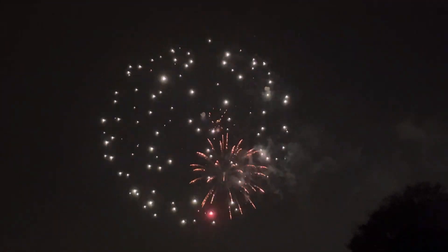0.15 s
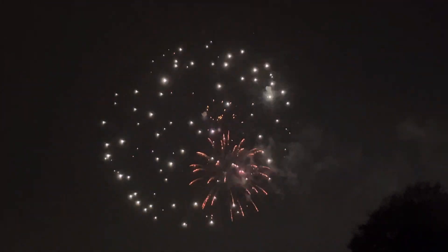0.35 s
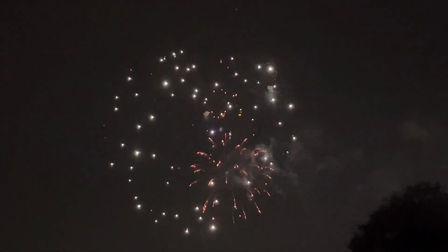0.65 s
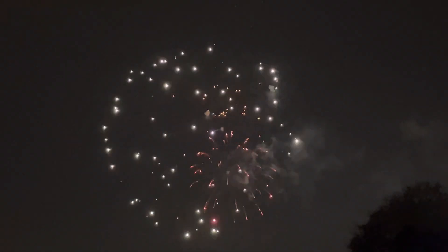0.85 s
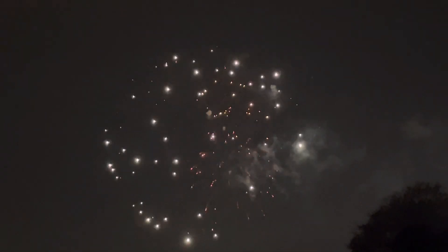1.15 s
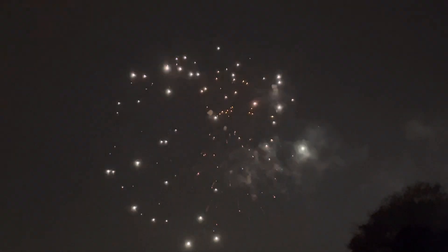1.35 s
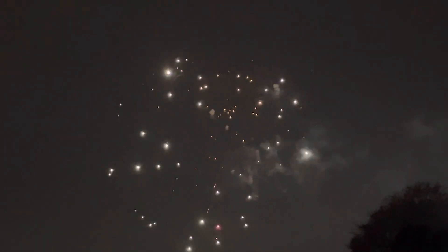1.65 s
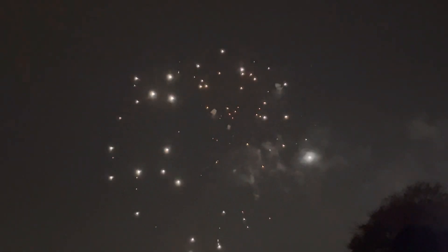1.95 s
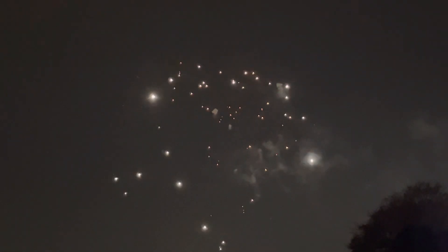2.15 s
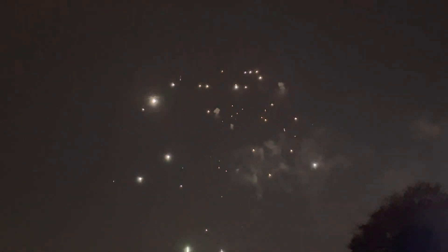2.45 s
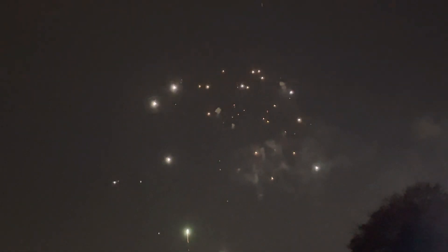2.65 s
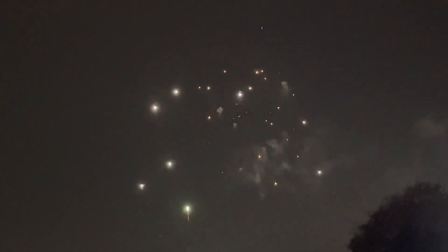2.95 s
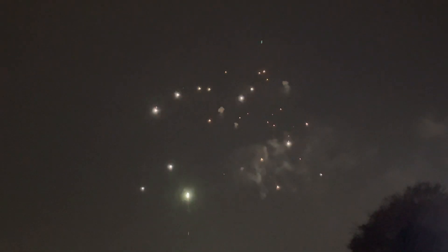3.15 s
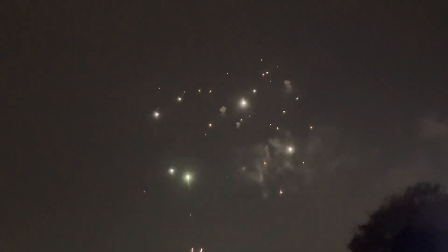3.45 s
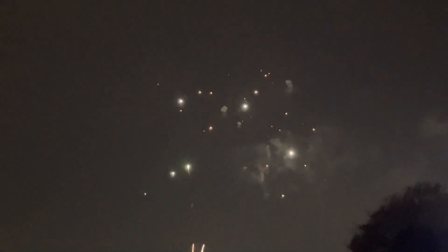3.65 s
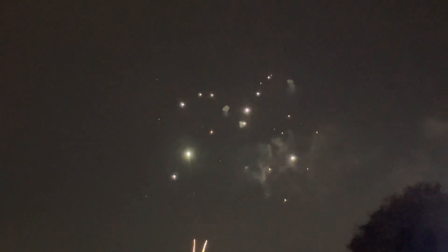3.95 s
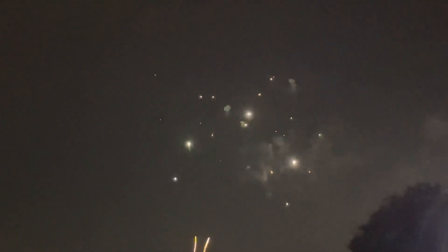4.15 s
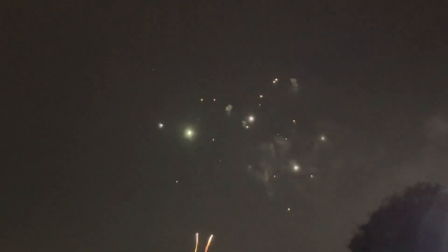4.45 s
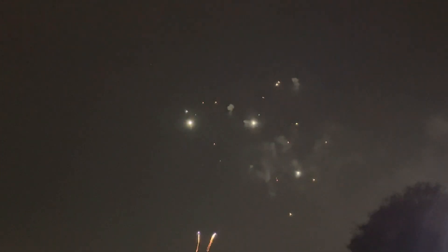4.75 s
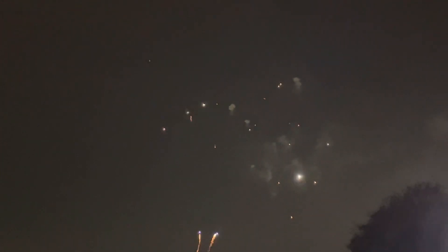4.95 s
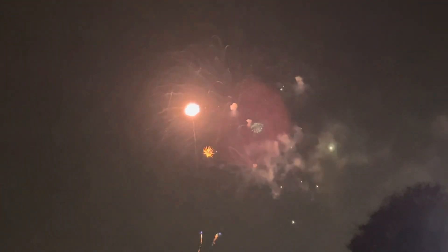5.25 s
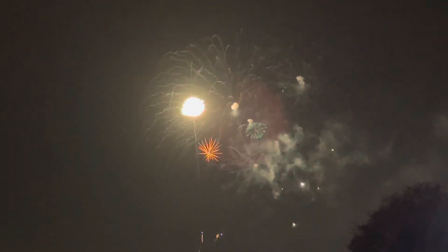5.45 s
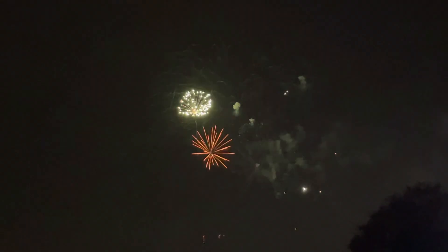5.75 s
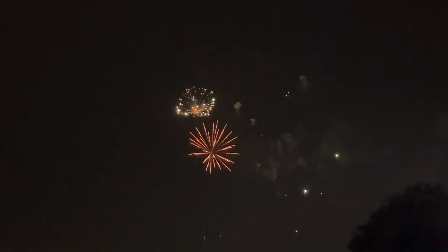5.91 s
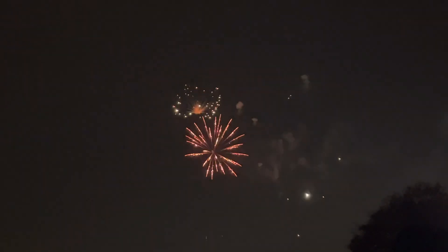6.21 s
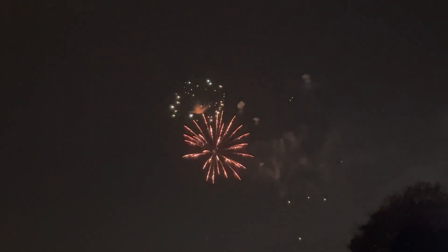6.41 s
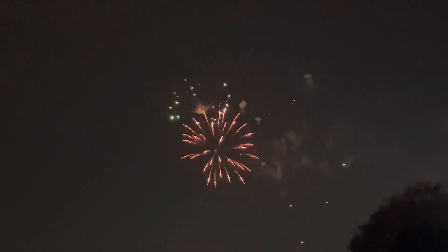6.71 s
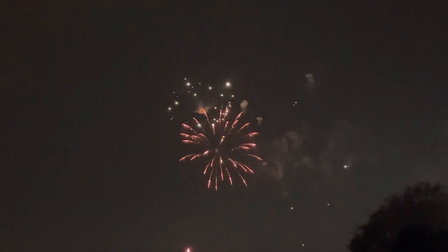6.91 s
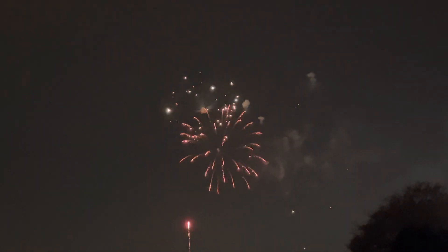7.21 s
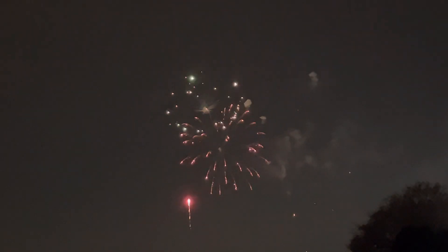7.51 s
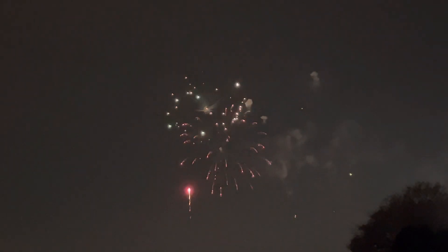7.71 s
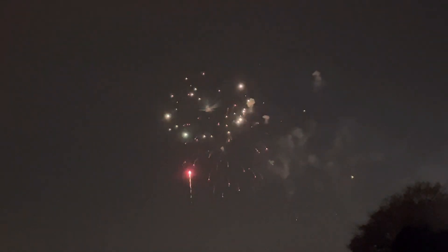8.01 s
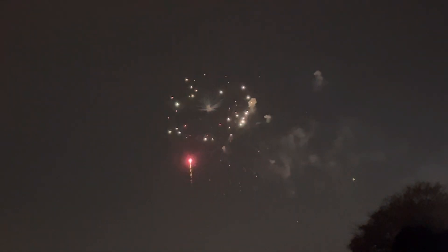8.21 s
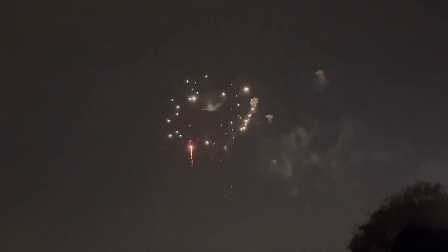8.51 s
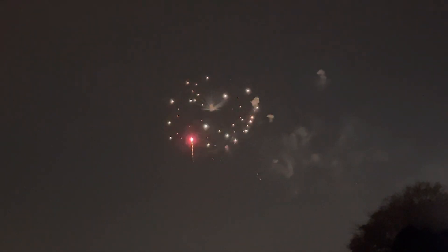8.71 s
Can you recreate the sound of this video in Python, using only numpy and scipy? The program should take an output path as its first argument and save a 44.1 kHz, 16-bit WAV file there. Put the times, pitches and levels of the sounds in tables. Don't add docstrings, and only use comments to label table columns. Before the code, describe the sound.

A firework display at night in the open. A dull bang opens, then a very sharp crack near two seconds. Around four seconds two launch charges knock close together, then quieter rumbling. A strong doubled bang comes just after seven seconds and a low booming launch near eight and a half. Echoes slap back from buildings, over distant thuds; a small handheld microphone adds faint hiss and rustle.

```python
import sys
import numpy as np
from scipy import signal
from scipy.fft import rfft, irfft, next_fast_len
from scipy.io import wavfile
from scipy.ndimage import uniform_filter1d

SR = 44100
rng = np.random.default_rng(int(sys.argv[2]) if len(sys.argv) > 2 else 0)


def decibels_to_gain(level_db):
    exponent = np.asarray(level_db, float) / 20
    return 10 ** exponent


def int16_out(signal):
    q = np.round(np.clip(np.atleast_2d(signal).T, -1, 1) * 32767)
    wavfile.write(sys.argv[1], SR, q.astype(np.int16))


N = 391166

# (time [s], wave length [ms], ground echo delay [ms], echo share [ratio], shock front [Hz])
BURSTS = [
    (.3871, 2.27, 1.87, 0.5, 1870),
    (1.8937, 3.14, 2.73, 1.3, 9400),
    (7.1675, 2.17, 3.65, 2.15, 4060),
]
# (time [s], knock [dB], boom against knock [dB], crack against knock [dB], knock [Hz])
LIFTS = [
    (3.915, -4.5, 5, 2, 807),
    (4.307, -8, 3.5, 4, 730),
    (8.409, -10.5, 9, 9, 454),
]
# (frequency [Hz], side against middle [dB])
DIFFUSE_SIDE = [(60, -12.5), (110, -11), (200, -15), (380, -8), (700, -2), (1290, -4.5), (2380, -31),
                (4400, -12.5), (8120, -3.5), (15000, -6)]


def read(points, hz):
    f, value = np.transpose(points)
    return np.interp(np.log(hz + 1), np.log(f + 1), value)


def evened(x):
    return x / np.sqrt(np.mean(x ** 2) + 1e-20)


def peaked(x):
    return x / abs(x).max()


def add(mix, s, sound):
    part = mix[round(s * SR):][:len(sound)]
    part += sound[:len(part)]


def shaped(x, gain):
    size = next_fast_len(x.shape[-1] + 4096)
    spectrum = rfft(x, size) * gain(np.fft.rfftfreq(size, 1 / SR))
    return irfft(spectrum, size)[..., :x.shape[-1]]


def coloured(x, points):
    return shaped(x, lambda hz: decibels_to_gain(read(points, hz)))


def band(x, hz, width):
    return signal.lfilter(*signal.iirpeak(hz, hz / width, SR), x)


def wide(middle, side, side_points):
    side = coloured(side, side_points)
    return np.array([middle + side, middle - side])


def burst(s, wave_ms, echo_ms, share, front_hz):
    shell_db, shared = 3.5, 0.9
    ms = np.arange(2000) / SR * 1000
    wave = (1 - ms / 0.73) * np.exp(-ms / 2.0 - np.maximum(ms - wave_ms, 0) / 0.28)
    wave = signal.lfilter(*signal.butter(1, front_hz, fs=SR), wave)
    lag = round(echo_ms / 1000 * SR)
    wave[lag:] += share * wave[:-lag]
    return s, decibels_to_gain(shell_db) * wave / (1 + share) ** shared


def shells_overhead():
    # (frequency [Hz], gain [dB])
    air = [(22, -33), (35, -8), (55, 1), (90, 12.5), (220, 3.5), (400, 7), (1500, 5.5), (3000, 5),
           (5000, -9.5), (7000, -11), (9000, -56), (16000, -60.5)]
    mix = np.zeros(N)
    for row in BURSTS:
        add(mix, *burst(*row))
    return coloured(mix, air)


def report(chance, boom_s, front, smear_s, s, db, boom_db, crack_db, knock_hz, crack_hz):
    lead_s = .012
    t = np.arange(len(chance)) / SR - lead_s
    spread = np.where(t < 0, 0.26 * np.exp(t / 0.0028), np.exp(-t / smear_s))
    arrivals = chance ** 3 * spread
    first = np.arange(len(t)) == round(lead_s * SR)
    knock = band(band(front * first + arrivals, knock_hz, 150), knock_hz, 850)
    crack = band(arrivals, crack_hz, 620) + 0.033 * band(arrivals, 1500, 1800)
    cycle = (t - .0074) * 88
    boom = np.cos(2 * np.pi * cycle + 4.64) * np.exp(-((t - boom_s) * 135) ** 2)
    sound = 1.2 * peaked(knock) + 1.15 * decibels_to_gain(crack_db) * peaked(crack) + decibels_to_gain(boom_db) * boom
    return s - lead_s, decibels_to_gain(db) * sound


def lift_charges():
    mix = np.zeros(N)
    for row, chance in zip(LIFTS, rng.standard_normal((len(LIFTS), 2400))):
        crack_hz = 840 + 0.9 * row[-1]
        add(mix, *report(chance, .0085, 43.5, 0.0048, *row, crack_hz))
    return mix


def thrown_back():
    wall_lag = [.151, .157, .164, .179, .177, .176]
    # (knock [dB], crack against knock [dB], knock [Hz], crack [Hz])
    wall = [
        (-19, -7.5, 416, 950),
        (-26, 3.5, 720, 1280),
        (-20, -1, 300, 830),
        (-12.5, -8, 490, 2200),
        (-19, -5.5, 615, 2360),
        (-18.5, 0, 596, 1960),
    ]
    # (delay [s], loss [dB], boom against knock [dB], knock [Hz])
    yard = [
        (.113, -25, 3, 510),
        (0.149, -34, 4.5, 635),
        (.2125, -20, 7, 637),
        (0.279, -30.5, -1, 437),
    ]
    # (time [s], knock [dB], crack against knock [dB], knock [Hz])
    later = [(0.58, -34, 0, 400), (0.666, -30, -9, 418), (0.705, -38.5, -17, 560), (0.779, -37, 3.5, 436),
             (0.852, -33, -16, 497), (2.088, -29.5, -1, 707), (2.194, -31.5, -20, 543),
             (2.238, -30.5, -12, 710), (2.282, -37.5, -6, 900), (2.358, -38.5, -17, 970),
             (3.451, -32.5, -13, 690), (3.735, -34, -25, 473), (4.867, -40.5, 1, 590),
             (5.154, -32, -10, 550), (5.216, -33, -14, 566), (5.259, -37.5, -19, 556),
             (5.347, -32, -7, 597), (5.542, -38, -11, 580), (5.609, -40.5, -12, 560),
             (5.741, -37, -17, 570), (5.99, -38.5, -13, 437), (6.39, -36, -23, 544), (7.356, -27, -16, 700),
             (7.371, -32, 2.5, 560), (7.397, -28, -7.5, 430), (7.479, -38, -8, 560),
             (7.522, -32.5, -16, 490), (7.57, -33, -11, 423), (8.649, -27, -2, 463), (8.735, -32, -15, 484)]
    slap_crack_hz = 1600
    booms = [-16.5] * len(BURSTS) + [row[2] - 0.5 for row in LIFTS]
    rows = []
    for bang, lag, boom, (db, *rest) in zip(BURSTS + LIFTS, wall_lag, booms, wall):
        rows.append((bang[0] + lag, db, boom, *rest))
    for s, db, *_ in LIFTS[:2]:
        for lag, loss, boom, hz in yard:
            rows.append((s + lag, db + loss, boom, -5.5, hz, slap_crack_hz))
    for s, db, crack, hz in later:
        rows.append((s, db, 2.5, crack, hz, slap_crack_hz))
    return rows


def thud(s, db, hz, cycles):
    v = np.arange(round(SR * (cycles + 2) / hz)) * hz / SR
    envelope = np.e * (3 * v / cycles) * np.exp(-3 * v / cycles)
    return s - .008, decibels_to_gain(db - 4.5) * np.sin(2 * np.pi * v) * envelope


def slaps_and_thuds():
    # (time [s], peak [dB], pitch [Hz], length
    bass_thuds = [(0.98, -20.5, 140, 7.3), (1.247, -16.5, 134.7, 3.2), (1.703, -20.5, 228, 3.3),
                  (2.858, -30.5, 99.4, 0.42), (2.905, -21.5, 195, 1.9), (2.981, -18, 171, 3.7),
                  (3.203, -23.5, 172.6, 4.6), (4.161, -17, 82.6, 1.8), (4.561, -25.5, 62.2, 1.3),
                  (5.883, -18.5, 148.6, 1), (5.986, -20.5, 77.4, 1.6), (8.171, -29, 223, 2.9),
                  (8.237, -14, 185, 1.6), (8.303, -22.5, 83, 1.3), (8.655, -16.5, 87.3, 1.6),
                  (8.676, -21.5, 67.6, 2.5), (7.336, -18, 118.5, 3.2)]
    mix = np.zeros(N)
    rows = thrown_back()
    for row, chance in zip(rows, rng.standard_normal((len(rows), 2400))):
        add(mix, *report(chance, .0105, 21, 0.0062, *row))
    for row in bass_thuds:
        add(mix, *thud(*row))
    return mix


def echoes(x, decays, start_s, rise_s):
    # (frequency [Hz], gain [dB])
    leaves = [(40, -11), (150, 0), (400, 1.5), (2000, -0.5), (3500, 1), (5500, 3), (9000, 1.5)]
    taps = rng.choice([-1., 1.], (2, 2 * SR)) * (rng.random((2, 2 * SR)) < 2500 / SR)
    hz, t, z = signal.stft(taps, SR, nperseg=256)
    tail = signal.istft(z * decibels_to_gain(-60 * t / read(decays, hz)[:, None]), SR, nperseg=256)[1]
    tail *= np.clip((np.arange(tail.shape[1]) / SR - start_s) / rise_s, 0, 1)
    both = signal.fftconvolve(x[None], tail / np.linalg.norm(tail[0]), axes=1)[:, :N]
    return wide(*coloured(both, leaves), DIFFUSE_SIDE)


def after_roll(t, start_db, rise_s, halving_db):
    bangs = [(-0.41, 0)]
    bangs += [(row[0], 0) for row in BURSTS] + [(row[0], -7) for row in LIFTS]
    power = 0
    for s, db in bangs:
        age = np.maximum(t - s, 0)
        fall_db = halving_db * np.log2(1 + age / 0.034)
        power = power + (1 - np.exp(-age / rise_s)) ** 2 * decibels_to_gain(start_db + db - fall_db) ** 2
    return power


def roll():
    # (frequency [Hz], density [dB per Hz])
    colour = [(15, -56), (25, -11), (39, -12.5), (59, 1), (181, -2), (230, -7), (371, -18), (570, -14.5),
              (855, -20.5), (1060, -23.5), (1170, -28), (2170, -36), (7500, -66), (9750, -109.5),
              (16500, -120)]
    # (time [s], level [dB])
    barrage = [(0.0, -36), (0.57, -34.5), (1.63, -32.5), (2.0, -26.5), (2.72, -35), (3.26, -29), (3.6, -33),
               (4.15, -32.5), (4.89, -34.5), (5.24, -35), (5.51, -38.5), (6.94, -42), (7.19, -38),
               (7.34, -30.5), (8.0, -37.5), (8.18, -34.5), (8.45, -26.5), (8.87, -34.5)]
    # (low edge [Hz], high edge [Hz], level at a barrage of -35 dB [dB], share of its swell [ratio])
    bands = [
        (1, 327, -35, 0.87),
        (334, 1440, -52, 1),
        (1254, 2900, -71, 0.82),
        (2700, 6300, -77, 0.2),
    ]
    # (start [dB], rise [s], loss per doubling of time [dB])
    afters = [
        (-30, .08, 3),
        (-43.5, .05, 2),
        (-42.5, 0.012, 4),
        (-48.5, 0.055, 6.5),
    ]
    frames, bins = N // 256 + 5, np.fft.rfftfreq(1024, 1 / SR)
    a, b, c, d, patches = rng.standard_normal((frames, 513, 5)).T
    patches = 1.2 * evened(uniform_filter1d(uniform_filter1d(patches, 8, 0), 8, 1))
    lumps = evened(uniform_filter1d(rng.standard_normal(frames), 6))
    lump_db = patches + 1.67 * lumps / (1 + bins[:, None] / 400)
    spectra = np.array([a + 1j * b, c + 1j * d]) * decibels_to_gain(lump_db)
    noise = signal.istft(spectra, nperseg=1024, noverlap=768)[1][:, :N]
    t = np.arange(0, N + 64, 64) / SR
    swell_db = np.interp(t, *np.transpose(barrage)) + 35
    out = np.zeros((2, N))
    for (low, high, db, share), after in zip(bands, afters):
        edges = lambda hz: 1 / (1 + (low / (hz + 1)) ** 8) / (1 + (hz / high) ** 8)
        part = shaped(noise, lambda hz: decibels_to_gain(read(colour, hz)) * edges(hz))
        level = np.sqrt(decibels_to_gain(db + share * swell_db) ** 2 + after_roll(t, *after))
        out += evened(part) * np.interp(np.arange(N) / SR, t, level)
    return wide(*out, DIFFUSE_SIDE)


def camera():
    # (frequency [Hz], density [dB per Hz])
    hiss_colour = [(2000, -20), (3500, -0.5), (4200, -7), (6000, -9.5), (7600, -11), (9000, -26.5),
                   (9600, -10.5), (11500, -4.5), (12300, -5), (15600, -22), (15800, -56.5)]
    # (frequency [Hz], side against middle [dB])
    hiss_side = [(3500, -9.5), (6000, -8), (8300, 9.5), (8450, 15.5), (9400, 31), (9600, 6), (11000, -0.5),
                 (12500, 1), (13000, -50.5)]
    # (frequency [Hz], rms level [dB])
    whines = [(10163, -99), (10223, -93), (15305, -101), (15364, -104)]
    # (time [s], level [dB], half length [s])
    rustles = [(0.0, -67, 0.023), (.55, -87, 0.067), (.65, -81, .02), (0.723, -87, 0.036), (1.05, -95, .12),
               (1.314, -72.5, 0.055), (1.49, -74, .1), (1.623, -71, .04), (2.05, -62.5, 0.019),
               (2.453, -67, 0.048), (2.93, -72, .05), (3.034, -75, .04), (3.4, -86, .25), (3.67, -72, .03),
               (3.793, -81, 0.037), (4.03, -78.5, 0.091), (4.176, -74, 0.034), (4.516, -79, 0.043),
               (5.34, -85, .015), (6.478, -76, .015), (7.05, -79, .15), (7.98, -72.5, 0.023),
               (8.103, -77, 0.044), (8.783, -86, 0.07)]
    pictures_per_s = 30
    a, b, c, d = rng.standard_normal((4, N))
    t = np.arange(N) / SR
    hiss = evened(coloured(np.array([a, b, d]), hiss_colour))
    gate = np.exp(-((t * pictures_per_s + 0.29) % 1 - .5) ** 2 / 0.039)
    gate *= decibels_to_gain(1.5 * evened(uniform_filter1d(rng.standard_normal(N), 1500)))
    buzz = decibels_to_gain(-73) * gate * evened(band(band(c, 11380, 500), 11380, 500))
    whine = sum(decibels_to_gain(db - 1.0) * np.sin(2 * np.pi * hz * t) for hz, db in whines)
    rubbing = sum(decibels_to_gain(db - 12 * ((t[::32] - s) / half) ** 2) for s, db, half in rustles)
    rustle = decibels_to_gain(3) * rubbing.repeat(32)[:N] * hiss[2]
    return decibels_to_gain(-73.5) * wide(*hiss[:2], hiss_side) + buzz + whine + rustle


def scene():
    # (frequency [Hz], gain [dB])
    treble_fall = [(1500, 1.5), (3200, -9), (4500, -21.5), (6000, -32), (8000, -48), (12000, -81.5)]
    # (frequency [Hz], gain [dB])
    wall_bright = [(1500, 0), (2600, 3.5), (4500, 3.5), (8000, 0)]
    # (frequency [Hz], decay by 60 dB [s])
    scatter = [(60, 0.066), (300, 0.16), (1000, 0.16), (3000, 0.17), (6000, 0.14)]
    # (frequency [Hz], decay by 60 dB [s])
    field = [(60, 0.67), (300, 1.18), (1000, 0.89), (3000, 1.14), (8000, 0.57)]
    shells = shells_overhead()
    lifts = coloured(lift_charges(), treble_fall)
    slaps = coloured(coloured(slaps_and_thuds(), treble_fall), wall_bright)
    near = echoes(decibels_to_gain(-11.5) * shells + decibels_to_gain(-10.5) * lifts + decibels_to_gain(-9.5) * slaps, scatter, 0.0016, 0.0013)
    far = echoes(decibels_to_gain(-26.5) * shells + decibels_to_gain(-28) * lifts, field, 0.05, 0.15)
    return shells + lifts + slaps + near + far + roll()


def band_limit(x):
    return signal.sosfilt(signal.butter(12, 16300, fs=SR, output="sos"), x)


def record(dry):
    # (frequency [Hz], left over right [dB])
    lean = [(60, -1.5), (110, -2), (200, -2), (380, -1.5), (700, -1.0), (1290, 1), (2380, -0.5), (4400, 2),
            (8120, -7), (15000, 15)]
    # (frequency [Hz], lead of left [rad])
    lead = [(400, 0), (690, .7), (1300, -.1), (3200, .3), (5000, 0)]
    half = np.array([[.5], [-.5]])
    ports = lambda hz: decibels_to_gain(half * read(lean, hz)) * np.exp(1j * half * read(lead, hz))
    late = lambda hz: np.exp(-2j * np.pi * 1.3 * np.log((hz + 15) / (hz + 800)))
    x = np.pad(dry, ((0, 0), (0, 2000)), "reflect")
    x = shaped(x, lambda hz: ports(hz) * late(hz))[:, :N]
    x = x / (1 + abs(x) ** 6) ** (1 / 6)
    x = x * np.minimum((N - np.arange(N)) / 200, 1)
    return band_limit(x + camera())


dry = scene()
out = record(dry)
int16_out(out)
```